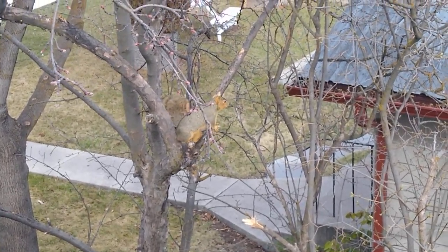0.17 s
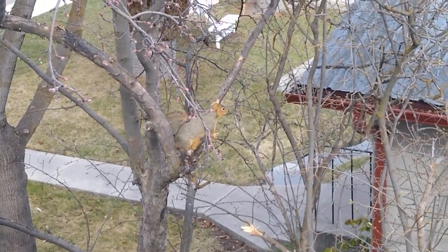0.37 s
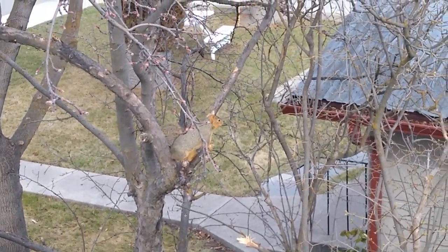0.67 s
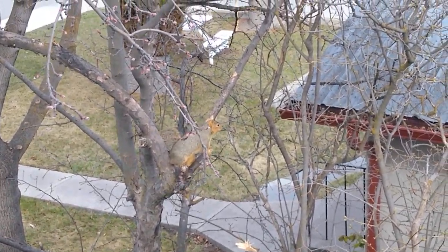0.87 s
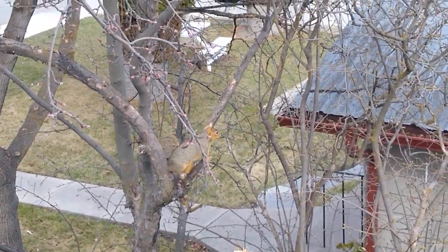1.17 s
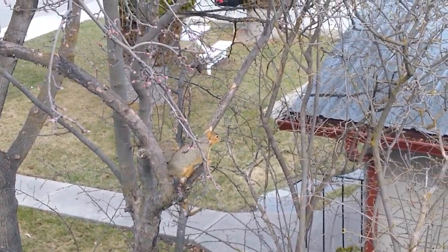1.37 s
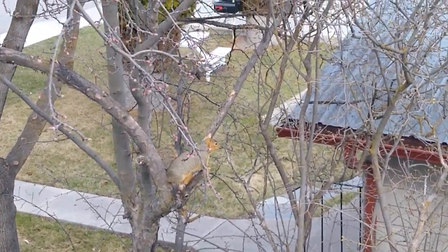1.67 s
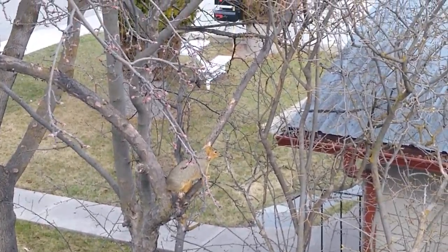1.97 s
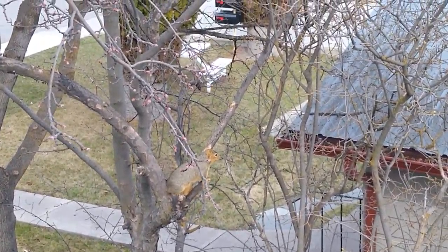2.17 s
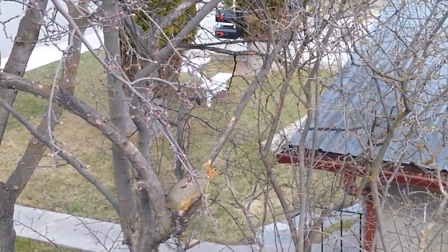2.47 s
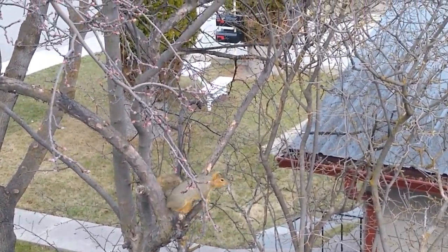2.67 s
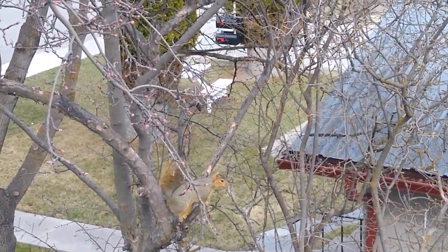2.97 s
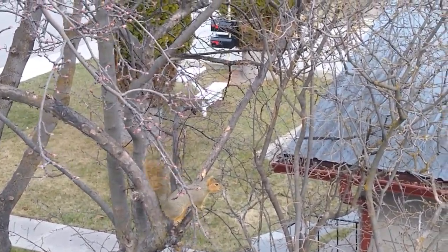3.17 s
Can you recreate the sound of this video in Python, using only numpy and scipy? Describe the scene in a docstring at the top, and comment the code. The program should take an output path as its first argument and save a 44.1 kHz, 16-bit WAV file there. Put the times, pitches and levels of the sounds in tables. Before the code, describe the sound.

A squirrel in a bare tree scolds with seven hoarse chucks, pauses, then gives three more; small birds chirp across a yard while low wind rumbles and thumps, mostly on the left of the microphone.

```python
"""Wind comes first: it buffets the left microphone port hard and the right lightly, and moans over a faint hiss.
At once a squirrel in a bare tree scolds: seven hoarse chucks of noise through throat and mouth resonances.
From 0.27 s two small birds chirp across a yard with gliding near-sine tones; two faint fuzzy hoots sound far
off, and a high fuzzy tone softly opens a slurred chirp. At 2.6 s come bright noise ticks close by on the left,
one single and one double. From 2.8 s the squirrel gives a second run of three chucks."""
import sys
import numpy as np
from scipy import signal
from scipy.fft import rfft, irfft
from scipy.io import wavfile
from scipy.ndimage import uniform_filter1d

SR = 44100
rng = np.random.default_rng(int(sys.argv[2]) if len(sys.argv) > 2 else 0)


def store_wav(level_fs):
    """Save 16-bit WAV to argv[1]."""
    pcm = np.round(np.clip(np.atleast_2d(level_fs), -1, 1) * 32767)
    wavfile.write(sys.argv[1], SR, pcm.T.astype(np.int16))


N = 145530  # length in samples, 3.3 s

# strength of the wind at each port: (time [s], level [dB]); the left one is raised by LEFT_BOOST_DB
GUSTS_LEFT = [(0.0, -28.5), (0.05, -40), (0.14, -34), (0.16, -32.5), (0.2, -38.5), (0.27, -32),
              (0.28, -36.5), (0.52, -40), (0.56, -31.5), (0.61, -63), (0.64, -35.5), (0.72, -47.5),
              (0.76, -39), (0.85, -43), (0.87, -37.5), (1.01, -50), (1.06, -41), (1.11, -52.5),
              (1.18, -52.5), (1.2, -54.5), (1.3, -33.5), (1.36, -48), (1.54, -39.5), (1.57, -41.5),
              (1.61, -59.5), (1.77, -57.5), (1.82, -65.5), (1.99, -65), (2.03, -56), (2.09, -62),
              (2.13, -50.5), (2.19, -57.5), (2.36, -37.5), (2.39, -40.5), (2.42, -39.5), (2.55, -69),
              (2.59, -54.5), (2.72, -43.5), (2.86, -54), (2.94, -41.5), (2.98, -45.5), (3.0, -37.5),
              (3.09, -46.5), (3.19, -56.5), (3.27, -55), (3.3, -61)]
GUSTS_RIGHT = [(0.0, -55), (0.12, -48.5), (0.48, -70), (0.52, -64), (0.58, -47.5), (0.88, -68.5),
               (0.96, -49), (1.1, -60), (1.18, -43.5), (1.24, -57.5), (1.6, -71), (1.64, -55),
               (1.78, -50.5), (1.92, -62), (2.04, -48), (2.18, -65), (2.22, -48.5), (2.38, -55.5),
               (2.54, -65.5), (2.6, -80), (2.66, -36), (2.72, -58.5), (3.18, -57), (3.28, -43)]
# relative colour of the wind noise at each port: (frequency [Hz], density [dB per Hz])
WIND_COLOUR_LEFT = [(8.8, -49), (15, -20), (38, -3.5), (86, 7), (134, 8.5), (389, -19), (557, -27),
                    (708, -49), (900, -44), (1170, -59.5), (1980, -120)]
WIND_COLOUR_RIGHT = [(15, -8), (80, 9), (150, -4), (250, -25), (500, -42.5), (900, -64.5)]
# sharp wind thumps on the left port, before THUMP_DB is added:
# (centre [s], level [dB], pitch [Hz], direction [+1 dips then rises, -1 rises then dips])
THUMPS = [(0.028, -14, 199, 1), (0.065, -10, 206, 1), (0.089, -7, 146, 1), (0.156, -14, 207, -1),
          (0.261, -4.5, 140, 1), (0.388, -12, 213, 1), (0.503, -17.5, 187, -1), (0.561, -19, 90.3, 1),
          (0.645, -22, 160, -1), (0.82, -11, 124, 1), (0.879, -20, 150, -1), (1.298, -8.5, 173, 1),
          (1.566, -16, 102, 1), (2.305, -15.5, 157, -1), (2.36, -10, 160.5, 1), (3.014, -19, 169, -1)]
# strength of the wind's moans: (time [s], low band [dB], high band [dB])
MOAN_LEVELS = [(0.0, -74, -63), (0.09, -66.5, -64.5), (0.35, -59, -74.5), (0.51, -55.5, -78),
               (0.63, -68.5, -70.5), (0.76, -66, -86.5), (0.92, -67, -84), (1.07, -84.5, -77.5),
               (1.28, -84, -81), (1.44, -77.5, -79.5), (1.75, -72.5, -83.5), (1.88, -75.5, -79),
               (2.0, -70.5, -78.5), (2.23, -62, -72.5), (2.37, -68.5, -74), (2.59, -67.5, -65.5),
               (2.97, -64.5, -67), (3.3, -66, -73.5)]
# the two moaning bands: (centre [Hz], width [Hz], left over right [dB])
MOAN_BANDS = [(515, 145, 4), (1035, 189, 10.5)]
# relative colour of the steady hiss: (frequency [Hz], density [dB per Hz])
HISS_COLOUR = [(180, -59), (300, -26), (546, 0.5), (713, -28), (994, -23.5), (1150, -22), (1210, -37),
               (1410, -12.5), (1780, -21.5), (16000, -27.5)]
# squirrel chucks: (start [s], time from start to fading [s], throat level [dB],
# breath against throat [dB], throat pitch [Hz])
CHUCKS = [(0.016, 0.057, -51.5, -5, 793), (.148, 0.019, -52.5, -4.5, 903), (0.25, 0.027, -55.5, -6, 871),
          (0.364, 0.028, -53.5, -11, 902), (0.487, 0.029, -57, -9, 935), (0.607, 0.028, -58, -7.5, 888),
          (0.737, 0.044, -65, -8, 902), (2.815, 0.062, -53, -1, 848), (2.953, 0.03, -53.5, -8, 893),
          (3.069, 0.03, -56, -6, 906)]
# mouth resonances that colour the breath: (centre [Hz], width [Hz], relative level [dB])
MOUTH = [(604, 240, -2.5), (1300, 233, -9), (2265, 190, -26), (2956, 530, -15), (3727, 190, -17),
         (5190, 1300, -29.5), (6760, 610, -24), (8150, 730, -13), (8990, 1100, -12.5), (10680, 960, -17),
         (15300, 5100, -12)]
# shape of each bird's syllable: (time from start [s], pitch [Hz], relative level [dB])
WARBLE = [(0, 3912, -10.5), (.008, 4455, -1.5), (.014, 5025, -3), (.019, 4925, 2), (.024, 4302, 4.5),
          (0.031, 3717, 11), (0.033, 3880, -10), (.039, 3921, 15), (.045, 3342, -0.5), (0.048, 3120, -14.5),
          (.054, 3290, 1), (0.063, 3445, 12), (.07, 3650, 0), (.078, 3833, 8.5), (0.083, 4017, 4),
          (0.089, 3492, -13), (.093, 3037, -0.5), (.101, 2960, -4.5), (0.106, 2860, -33)]
SLUR = [(0, 4300, -25), (.012, 3900, -10), (.024, 4100, -3.5), (.036, 3950, 5), (.05, 3550, 6.5),
        (.065, 2950, -2.5), (.07, 3237, -25.5), (.075, 3195, 3), (0.086, 2785, 2), (.096, 3050, -7.5),
        (0.104, 3447, -1.5), (.11, 3087, -4), (0.115, 2820, -7), (0.125, 2790, -26)]
# when each bird calls: (start [s], level [dB], left over right [dB])
WARBLE_CALLS = [(0.745, -57.5, 6), (1.584, -62, 5), (2.741, -57.5, 6)]
SLUR_CALLS = [(.273, -59.5, 5), (1.621, -59, 4), (2.43, -59.5, 2)]
# how long the yard rings: (frequency [Hz], time to die by 60 dB [s])
YARD_RINGING = [(500, 0.1), (1500, 0.96), (2900, 0.59), (3400, 0.49), (4200, 0.55), (5200, 0.23),
                (7000, 0.35), (15000, 0.39)]
# faint fuzzy tones, two low far hoots and then a high one at the slurring bird's soft onset:
# (start [s], length [s], pitch [Hz], level [dB])
FUZZY_TONES = [(0.767, 0.099, 1700, -78.5), (0.88, 0.16, 1760, -81.5), (2.409, .05, 5500, -85)]
# bright ticks: (peak time [s], level [dB], rise time [s])
TICKS = [(2.6, -34.5, 0.0036), (2.758, -42, 0.0034), (2.765, -40, 0.0028)]
# relative colour of a tick: (frequency [Hz], density [dB per Hz])
TICK_COLOUR = [(710, -36), (1200, -13), (1660, -32), (1970, -19), (2270, -62), (2780, -15.5), (3640, -12),
               (7840, -16), (8450, -5), (12500, -18), (15800, 6.5)]

# wind and hiss
LEFT_BOOST_DB, LUMP_DB, LUMP_S = 6.5, 3.5, 0.011
BRIGHTEN = 0.64  # dB change above the lows for each dB of gust
THUMP_CYCLES, THUMP_DB = 0.44, -9
MOAN_SAME, MOAN_FLUTTER_DB = 0.36, 3  # share of the moan noise common to both ports; flutter depth
HISS_DB = -84.5

# squirrel
CHUCK_RISE_S, CHUCK_FALL_S, THROAT_WIDTH_HZ, CHUCK_WET_DB = 0.013, 0.015, 131, -9.5
DULLING, DULL_ABOVE_HZ = 0.78, 10000  # weaker breath loses its top faster
BREATH_GRAIN_DB, MOUTH_SHIFT_DB = 1.5, 2.5  # breath comes in grains; each chuck favours other resonances

# birds; pairs are (warbling bird, slurring bird)
LEFT_LAGS = (15, 7)  # samples by which the left port hears each bird later
WARBLE_RASP, SLUR_RASP = 0.17, 0.3  # the farther bird is rougher
UPPER_HZ, UPPER_DB, UPPER_AT_S, UPPER_S = 604, -9.5, 0.017, 0.007  # weak voice this far above the warble
SHADE_DB_PER_KHZ = -6.5  # the left port loses the higher notes
WALL_S, WALL_DBS, WALL_DB_PER_KHZ = 0.03, (-13, 2), 8  # a house wall returns high notes best
FAR_WALL_S, FAR_WALL_DB = 0.225, -27.5  # a late return from across the street
SCATTER_S, FAR_SCATTER_S, TWIGS_DB = 0.009, 0.07, -13  # near and far returns spread over these times
BIRD_WET_DB, UPPER_YARD_DB_PER_KHZ = -7.5, 5  # the yard returns the top notes more strongly
YARD_SWING = 0.23  # share of a syllable's level swings that the yard hears

# ticks and upper limit of the sound
TICK_FALL_S, TICK_TAIL_DB, TICK_TAIL_S, TICK_PAN_DB = 0.004, -13, 0.04, 8
EDGE_HZ = 15600


def amp(db):
    """Turns dB into a plain multiplier."""
    return 10 ** (np.asarray(db) / 20)


def evened(x):
    """Scales a sound to an average (rms) strength of 1."""
    return x / np.sqrt(np.mean(x ** 2) + 1e-20)


def over_time(table, column=1):
    """Draws one column of a table as a curve with a value for every sample."""
    columns = np.transpose(table)
    return np.interp(np.arange(N) / SR, columns[0], columns[column])


def read(points, hz):
    """Reads a table between its frequencies, on a logarithmic scale."""
    f, value = np.transpose(points)
    return np.interp(np.log(hz + 1), np.log(f + 1), value)


def coloured(x, spectrum):
    """Filters a sound by a spectrum in dB."""
    n = x.shape[-1]
    gain = amp(read(spectrum, np.fft.rfftfreq(n, 1 / SR)))
    return irfft(rfft(x) * gain, n)


def add(mix, s, sound):
    """Adds a sound into the mix from time s, cutting it off at the end."""
    part = mix[..., round(s * SR):][..., :sound.shape[-1]]
    part += sound[..., :part.shape[-1]]


def resonate(x, hz, width):
    """Keeps a steep-sided band around one frequency."""
    edges = [max(hz - width / 2, 20), min(hz + width / 2, 21000)]
    return signal.sosfilt(signal.butter(3, edges, "bandpass", fs=SR, output="sos"), x)


def lumps(seconds):
    """Random ups and downs of rms 1, made by smoothing noise twice."""
    size = max(round(seconds * SR), 2)
    smooth = uniform_filter1d(rng.standard_normal(N), size)
    return evened(uniform_filter1d(smooth, size))


def pan(db):
    """Gains for left and right that lie db apart."""
    return amp(np.array([[db / 2], [-db / 2]]))


def yard(x):
    """Sparse random echoes that die at their own pace in each band, different at each port."""
    taps = np.zeros((2, SR))
    # one tap in every 20 samples, at a random place
    at = np.arange(200, SR - 20, 20) + rng.integers(0, 20, (2, (SR - 201) // 20))
    np.put_along_axis(taps, at, rng.choice([-1., 1.], at.shape), 1)
    hz, t, bands = signal.stft(taps, SR, nperseg=256)
    dying = amp(-60 * t / read(YARD_RINGING, hz)[:, None])
    tail = signal.istft(bands * dying, SR, nperseg=256)[1]
    return signal.fftconvolve(x[None], tail / np.linalg.norm(tail[0]), axes=1)[:, :N]


def scattered(x, seconds=SCATTER_S):
    """A cluster of returns of random sign, partly different at each port."""
    size = round(seconds * SR)
    taps = rng.standard_normal((3, size)) * (rng.random((3, size)) < .03)
    taps = (taps[0] + .5 * taps[1:]) * np.hanning(size)
    return signal.fftconvolve(x, taps / np.linalg.norm(taps, axis=1, keepdims=True), axes=1)


def wind():
    """Lumpy low turbulence, unrelated at the two ports, reaching higher in strong gusts; thumps on the left."""
    out = np.zeros((2, N))
    ports = ((over_time(GUSTS_LEFT) + LEFT_BOOST_DB, WIND_COLOUR_LEFT),
             (over_time(GUSTS_RIGHT), WIND_COLOUR_RIGHT))
    low_pass = signal.butter(2, 170, fs=SR, output="sos")
    for port, (gust_db, colour) in enumerate(ports):
        lumpy = rng.standard_normal(N) * amp(LUMP_DB * lumps(LUMP_S))
        turbulence = evened(coloured(lumpy, colour))
        low = signal.sosfiltfilt(low_pass, turbulence)
        # the upper part is boosted within 14 dB of the strongest gust and cut below that
        brightness = amp(BRIGHTEN * (gust_db - gust_db.max() + 14))
        out[port] = amp(gust_db) * (low + (turbulence - low) * brightness)
    t = np.arange(-600, 600) / SR
    for s, db, hz, direction in THUMPS:
        swell = np.exp(-(hz * t / THUMP_CYCLES) ** 2)
        thump = direction * np.sin(2 * np.pi * hz * t) * swell
        add(out[0], s + t[0], amp(db + THUMP_DB) * thump)
    return out


def moans():
    """Two fuzzy, fluttering whistles of wind: narrow bands of noise, partly shared by the ports."""
    out = np.zeros((2, N))
    for column, (hz, width, pan_db) in enumerate(MOAN_BANDS, 1):
        a, b = rng.standard_normal((2, N))
        right = MOAN_SAME * a + np.sqrt(1 - MOAN_SAME ** 2) * b
        band = evened(resonate(np.array([a, right]), hz, width))
        level_db = over_time(MOAN_LEVELS, column) + MOAN_FLUTTER_DB * lumps(0.017)
        out += band * pan(pan_db) * amp(level_db)
    return out


def hiss():
    """Faint steady air and microphone noise; its level is set from 1.5 to 15.5 kHz."""
    air = coloured(rng.standard_normal((2, N)), HISS_COLOUR)
    return amp(HISS_DB) * air / np.std(resonate(air, 8500, 14000))


def squirrel():
    """Hoarse puffs of noise through a low throat resonance, with breath hissing in the mouth."""
    dry = np.zeros((2, N))
    t = np.arange(round(.16 * SR)) / SR
    rise = np.sin(np.pi / 2 * np.minimum(t / CHUCK_RISE_S, 1)) ** 2
    for start, hold, db, breath_db, throat_hz in CHUCKS:
        shape = rise * np.exp(-np.maximum(t - hold, 0) / CHUCK_FALL_S)
        air = rng.standard_normal((3, len(t)))
        breath = np.zeros((2, len(t)))
        for hz, width, level in MOUTH:
            port_air = air[0] + air[1:] * (0.17 + 1.4 * (hz > 2000))  # the ports differ more up high
            level_db = level + MOUTH_SHIFT_DB * rng.standard_normal()
            if hz > DULL_ABOVE_HZ:
                level_db += DULLING * breath_db
            breath += amp(level_db) * evened(resonate(port_air, hz, width))
        throat = evened(resonate(air[0], throat_hz, THROAT_WIDTH_HZ))
        grain_db = BREATH_GRAIN_DB * lumps(0.0011)[:len(t)]
        add(dry, start, amp(db) * shape * (throat + amp(breath_db + grain_db) * breath))
    return dry + amp(CHUCK_WET_DB) * yard(dry[0])


def birds():
    """Slightly raspy, gliding near-sine syllables, thrown back by walls and twigs and smeared by the yard."""
    dry, to_yard = np.zeros((2, N)), np.zeros(N)
    kinds = zip((WARBLE, SLUR), (WARBLE_CALLS, SLUR_CALLS), LEFT_LAGS, WALL_DBS,
                (amp(UPPER_DB), 0), (WARBLE_RASP, SLUR_RASP))
    for syllable, calls, lag, wall_db, upper, roughness in kinds:
        s, hz, level = np.transpose(syllable)
        t = np.arange(0, s[-1], 1 / SR)
        pitch, level = np.interp(t, s, hz), np.interp(t, s, level)
        khz = pitch / 1000
        phase = 2 * np.pi * np.cumsum(uniform_filter1d(pitch, size=150)) / SR
        upper_swell = upper * np.exp(-((t - UPPER_AT_S) / UPPER_S) ** 2)
        tone = np.sin(phase) + upper_swell * np.sin(phase + 2 * np.pi * UPPER_HZ * t)
        tone *= signal.windows.tukey(len(t), .08)
        left_shade = amp(SHADE_DB_PER_KHZ * np.maximum(khz - 4.2, 0))
        wall_gain = amp(wall_db + WALL_DB_PER_KHZ * (khz - 5))
        yard_db = YARD_SWING * level + UPPER_YARD_DB_PER_KHZ * np.maximum(khz - 4, 0)
        for start, db, pan_db in calls:
            rough = np.convolve(rng.standard_normal(len(t)), np.hanning(130), "same")
            raspy = tone * (1 + roughness * evened(rough))
            voice = amp(db + level) * raspy * pan(pan_db)
            swapped = voice[::-1]  # near returns lean to the other side
            add(dry[0], start + lag / SR, voice[0] * left_shade)
            add(dry[1], start, voice[1])
            add(dry, start, amp(TWIGS_DB) * scattered(swapped))
            add(dry, start + WALL_S, scattered(wall_gain * swapped))
            add(dry, start + FAR_WALL_S, amp(FAR_WALL_DB) * scattered(voice, FAR_SCATTER_S))
            add(to_yard, start, amp(db + yard_db) * raspy)
    return dry + amp(BIRD_WET_DB) * yard(to_yard)


def fuzzy_tones():
    """Two low far hoots, then a high tone at the slurring bird's soft onset, each a narrow band of noise."""
    out = np.zeros((2, N))
    for start, length, hz, db in FUZZY_TONES:
        size = round(length * SR)
        band = evened(resonate(rng.standard_normal(4 * SR // 10), hz, 130))
        add(out, start, amp(db) * signal.windows.tukey(size, .8) * band[-size:])
    return out


def ticks():
    """Short bright bursts of noise with a quick fall and a longer fizzy tail."""
    out, t = np.zeros((2, N)), np.arange(-.012, .16, 1 / SR)
    after = np.maximum(t, 0)
    fall = np.exp(-after / TICK_FALL_S) + amp(TICK_TAIL_DB) * np.exp(-after / TICK_TAIL_S)
    for s, db, rise in TICKS:
        shape = np.exp(np.minimum(t, 0) / rise) * fall
        noise = evened(coloured(rng.standard_normal((2, len(t))), TICK_COLOUR))
        add(out, s + t[0], amp(db) * shape * noise)
    return out * pan(TICK_PAN_DB)


def scene():
    """Adds all the sounds together."""
    return wind() + moans() + hiss() + squirrel() + birds() + fuzzy_tones() + ticks()


def record(dry):
    """Removes everything above the upper frequency limit with a steep low-pass filter."""
    low_pass = signal.firwin(1023, EDGE_HZ, window=("kaiser", 9), fs=SR)
    return signal.oaconvolve(dry, low_pass[None], "same")


dry = scene()
out = record(dry)
store_wav(out)
```